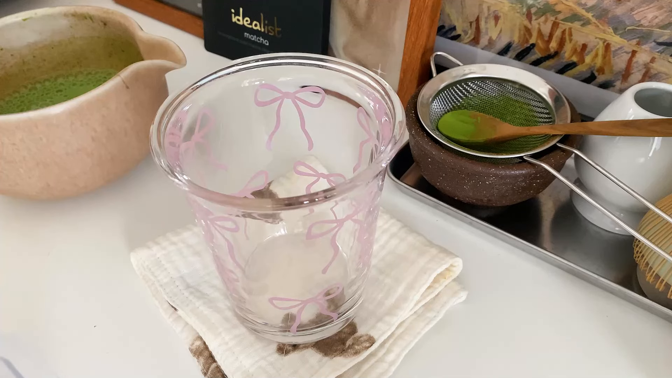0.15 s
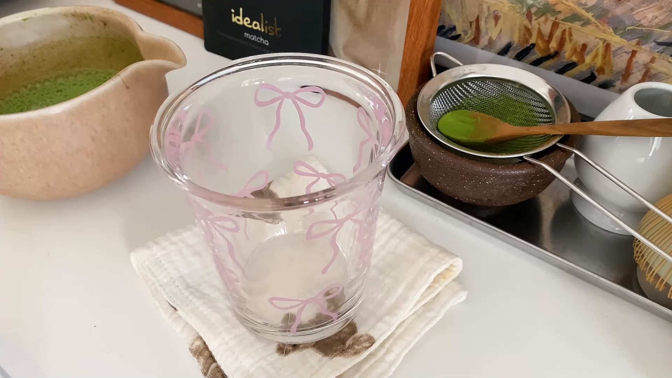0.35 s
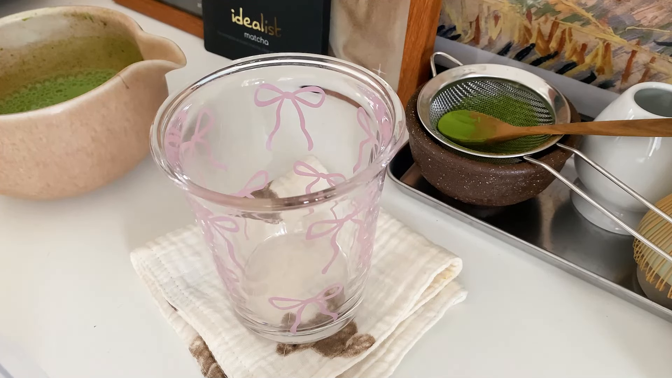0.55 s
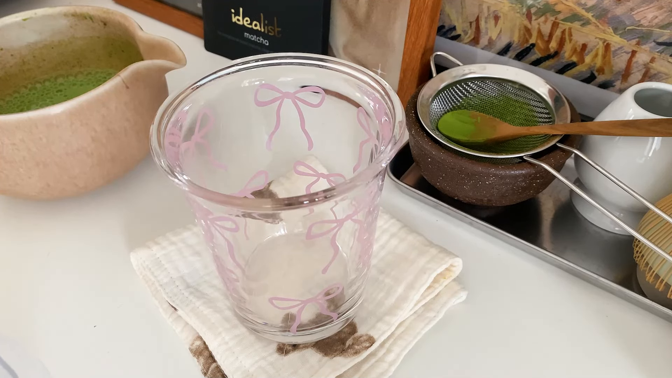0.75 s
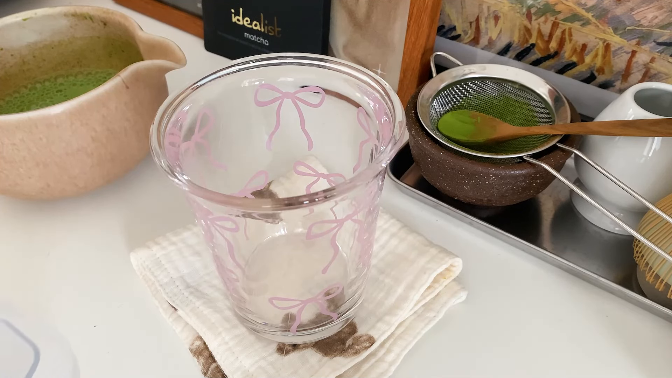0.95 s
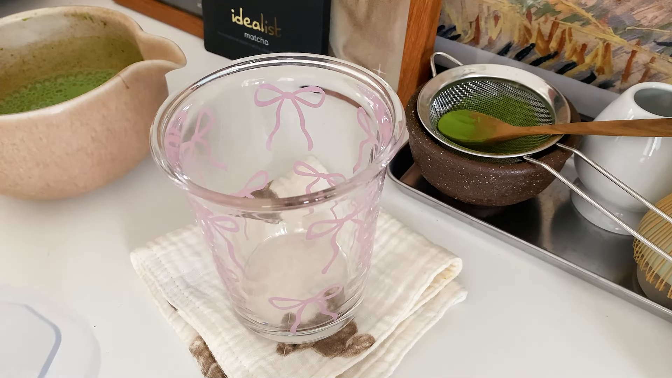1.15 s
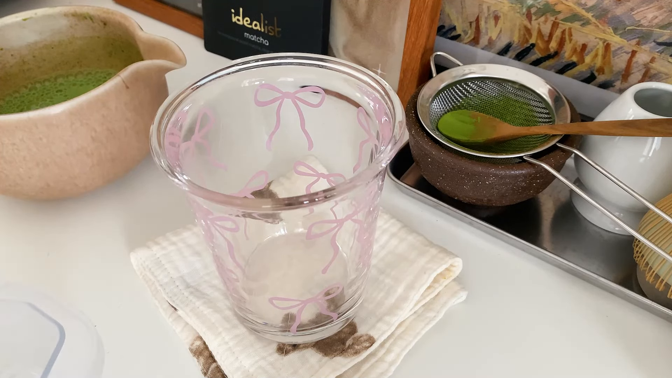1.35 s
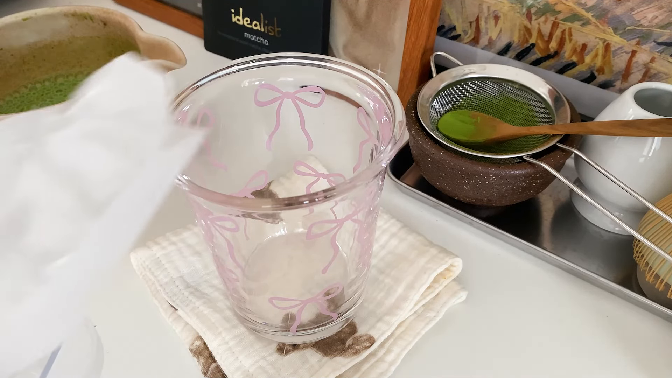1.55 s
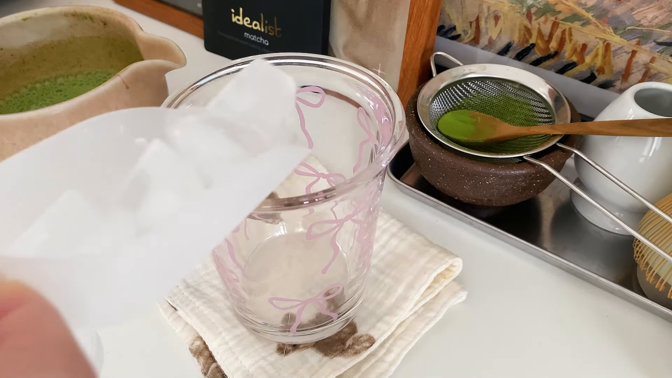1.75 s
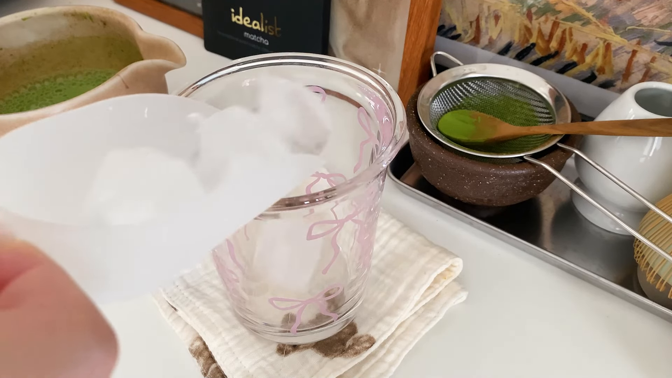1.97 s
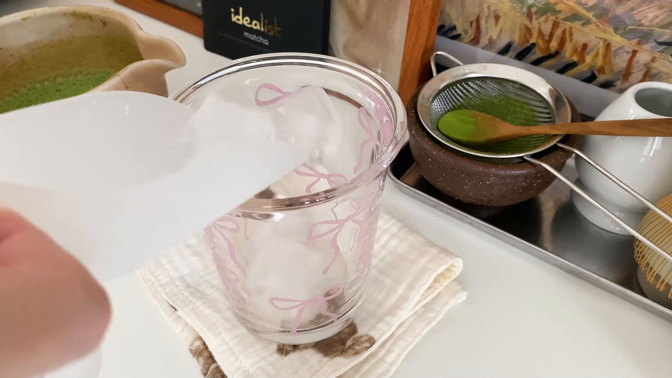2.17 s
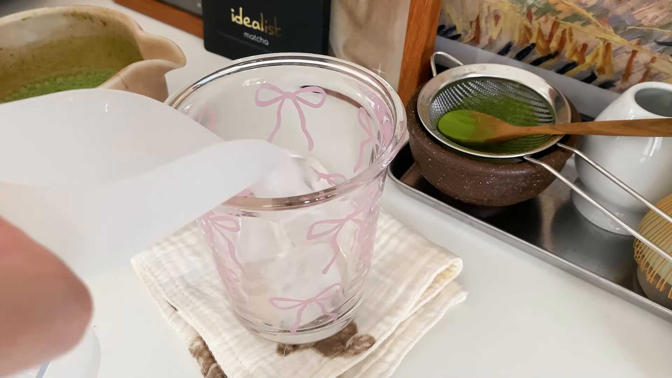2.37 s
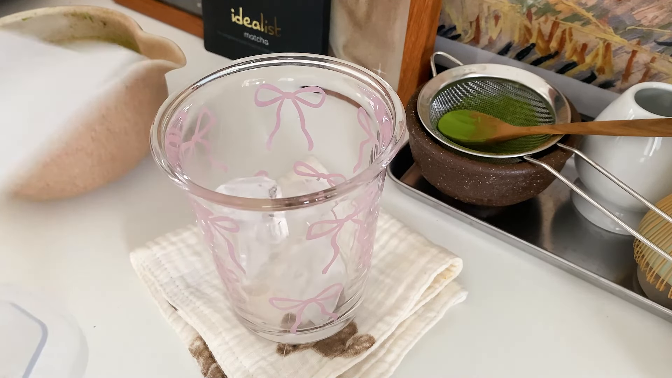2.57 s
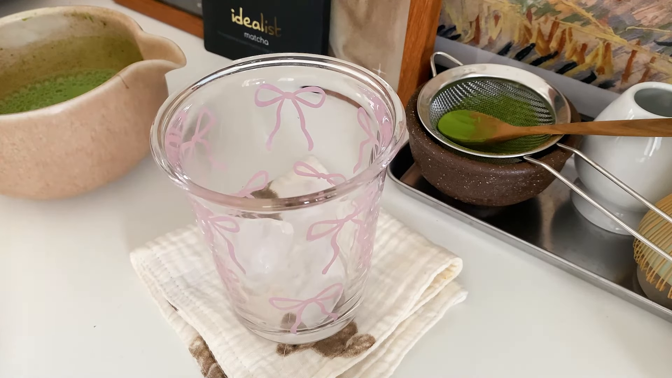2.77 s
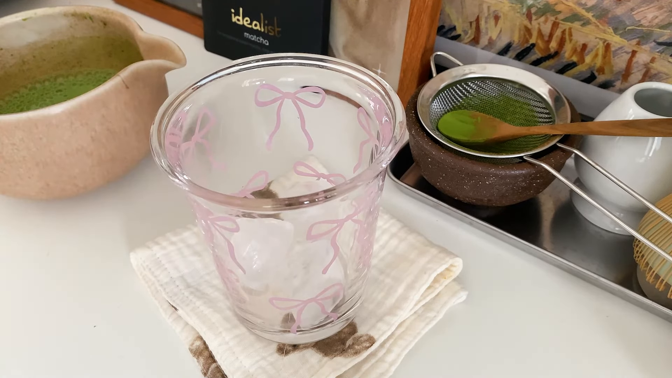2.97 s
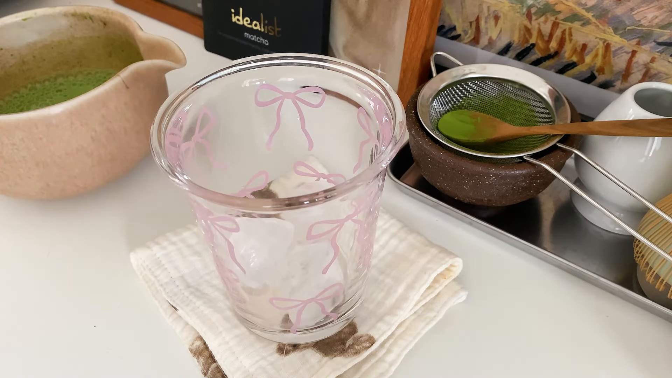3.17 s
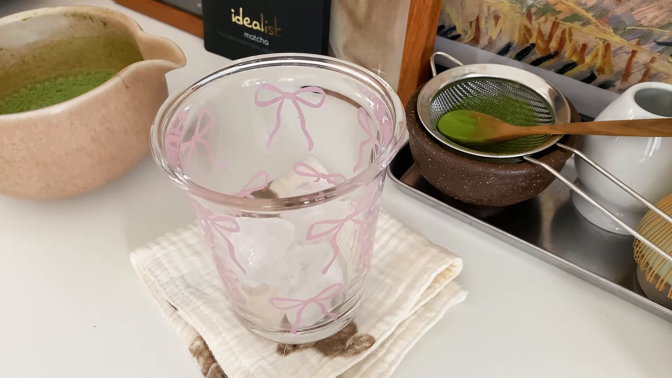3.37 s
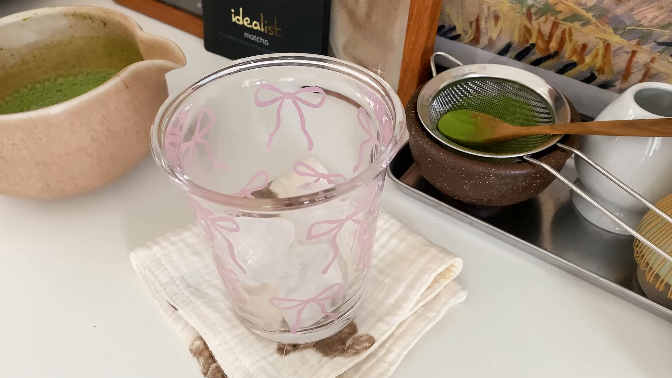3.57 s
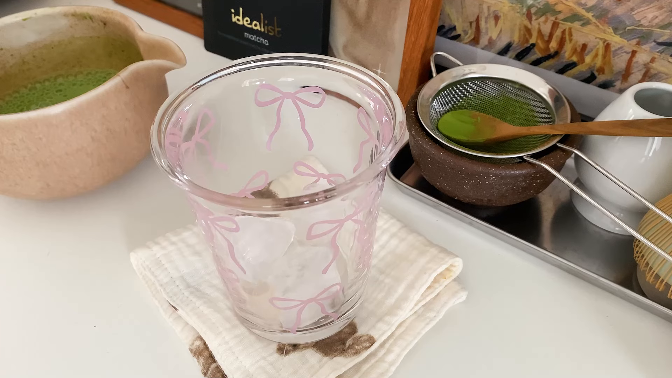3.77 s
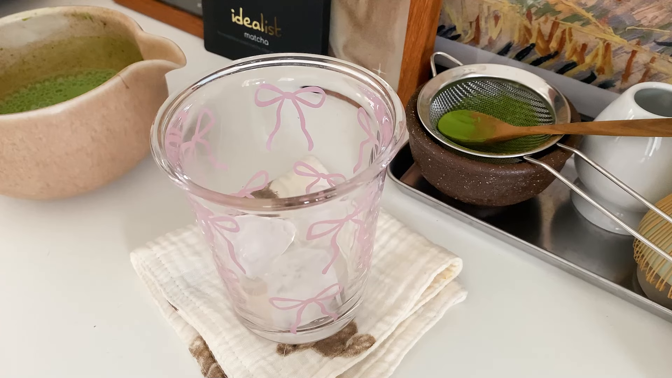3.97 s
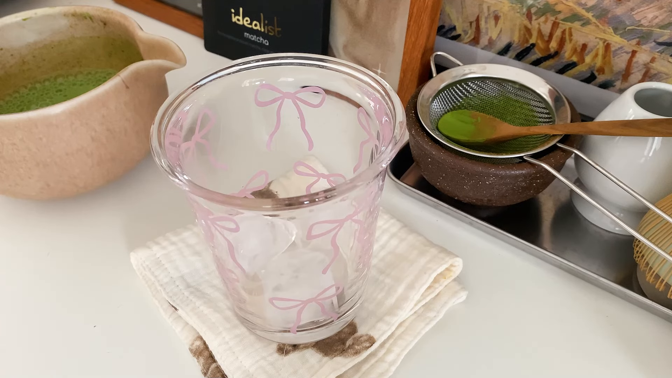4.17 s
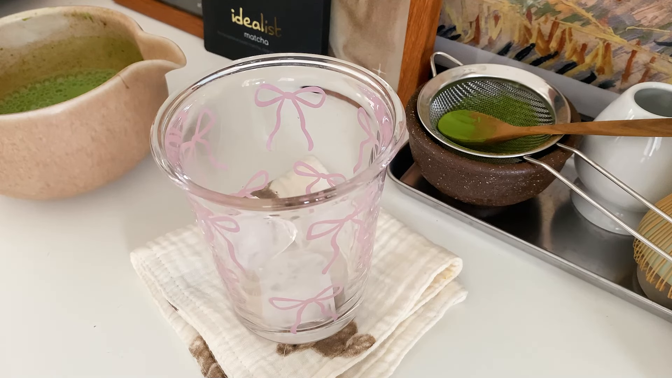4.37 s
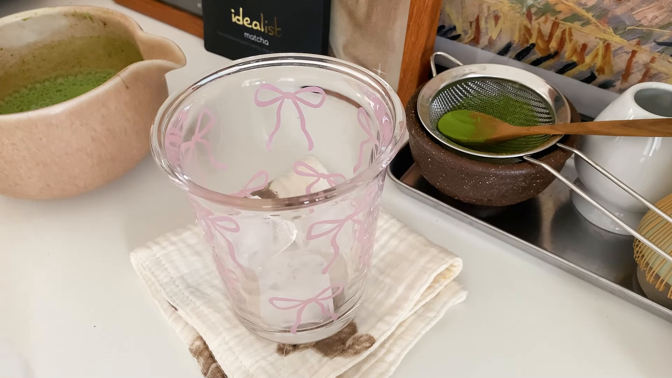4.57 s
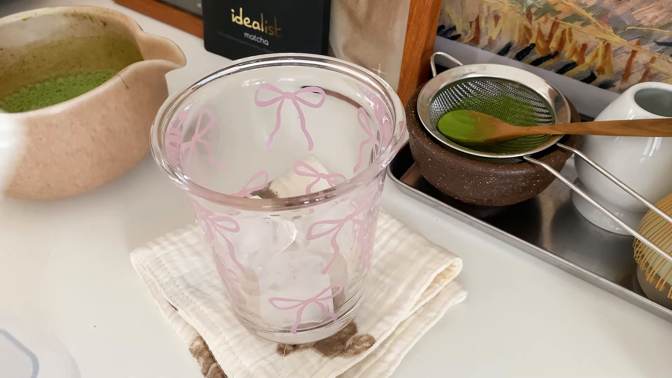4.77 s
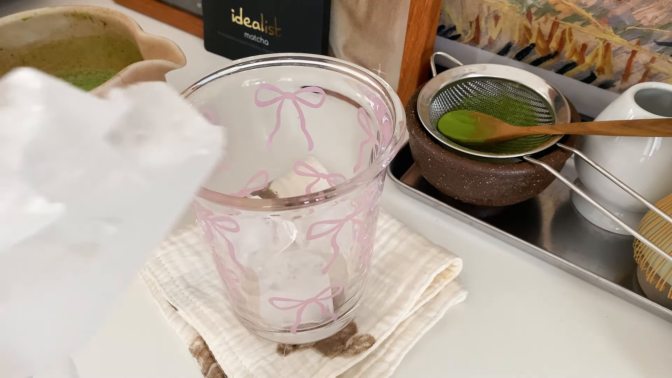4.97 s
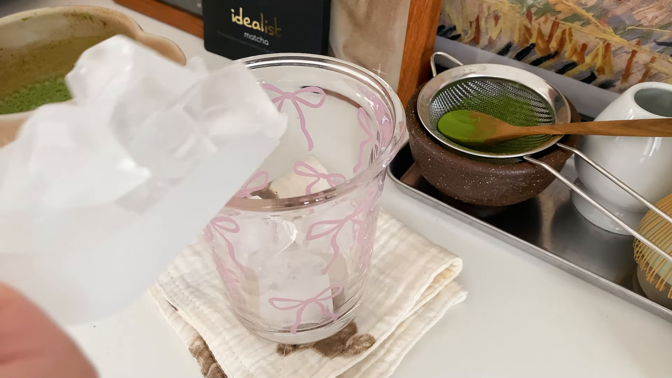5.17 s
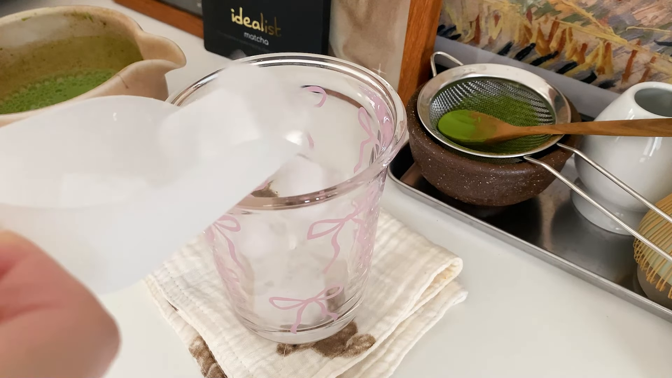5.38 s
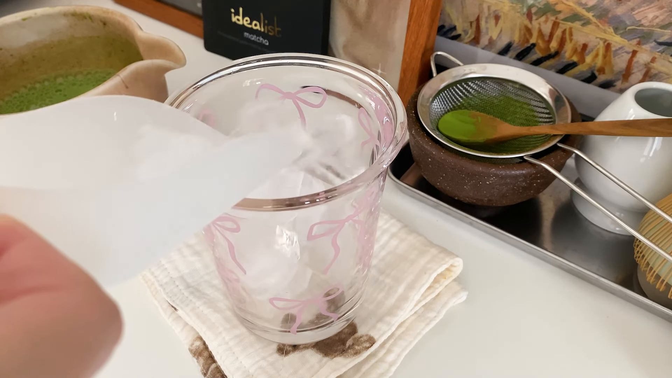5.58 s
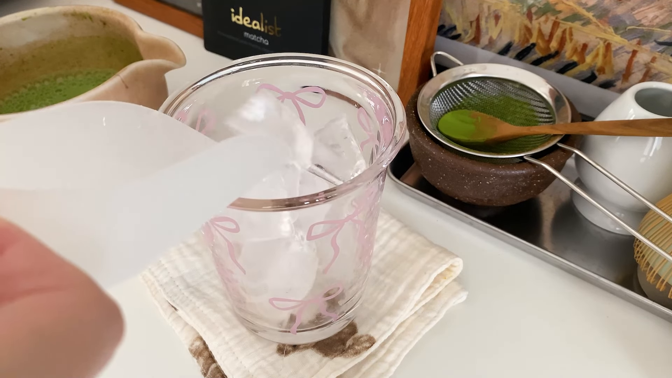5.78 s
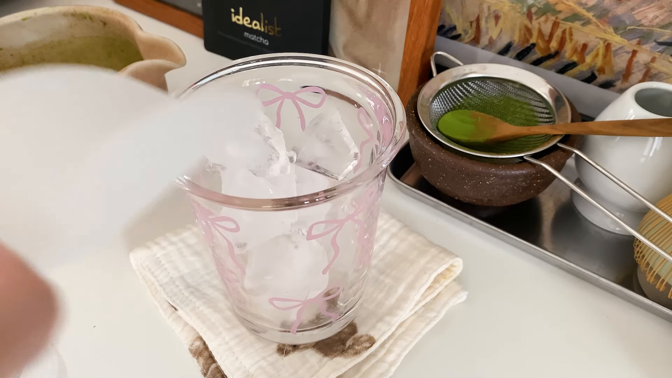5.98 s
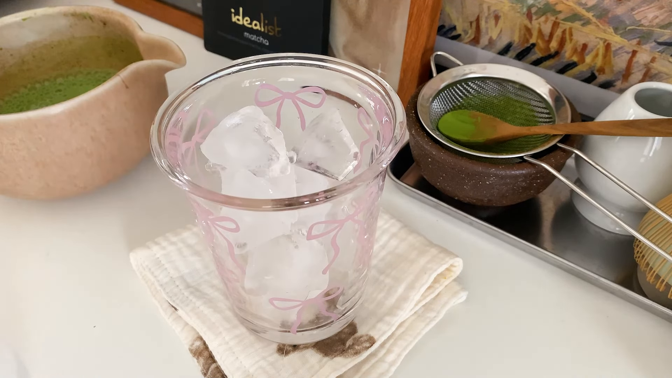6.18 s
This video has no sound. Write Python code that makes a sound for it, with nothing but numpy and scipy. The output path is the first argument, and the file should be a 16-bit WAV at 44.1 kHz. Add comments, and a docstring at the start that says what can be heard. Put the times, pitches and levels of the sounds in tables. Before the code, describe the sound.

A small, quiet kitchen with a soft low hush and a very faint appliance hum, picked up close in stereo leaning left. From 0 to 0.8 s a plastic scoop digs through ice: gritty crunch and hollow knocks, strongest around 0.2-0.7, with a few weaker rattles until 1.3. A lull, then light ticks at 1.75 as cubes slide down the scoop. From 1.97 to 2.8 they strike an empty glass in irregular sharp cracks with short bright clinks and a hollow airy note. A second, longer dig runs from 2.9 to 4.3, crunchy and clattering, with heavy knocks near 3.7 and 3.9. One low dull thump at 4.75. At 5.02 cubes tick in the scoop, wet ice squeaks briefly around 5.1-5.3, then a denser pour clatters from 5.3 to 5.9, ice on ice and glass, more damped, thinning out by 6.

```python
"""A small quiet kitchen, taken on a phone with two microphone ports; everything leans to the left port.
A plastic scoop twice digs through an ice bin and tips its cubes into a glass tumbler.
Grainy noise makes the crunch in the bin and the slide down the scoop; short bursts and notes make the
knocks and cracks; a bending tone is a squeak; each strike resets the fading modes of glass and air.
Under it lie soft broad noise and two faint appliance tones."""
import sys
import numpy as np
from scipy import signal
from scipy.fft import rfft, irfft, next_fast_len
from scipy.io import wavfile
from scipy.ndimage import uniform_filter1d

SR = 44100
rng = np.random.default_rng(int(sys.argv[2]) if len(sys.argv) > 2 else 0)


def put_to_file(sound):
    """Save the sound as 16-bit audio at rate SR, in the file named by the first command-line argument."""
    columns = np.atleast_2d(sound).T  # one column per channel
    safe = np.clip(columns, -1, 1)
    whole_steps = np.round(safe * 32767)
    wavfile.write(sys.argv[1], SR, whole_steps.astype(np.int16))


N = 274807

# Cubes striking the glass, and (5.02 to 5.30 s) a few ticking in the scoop before the second pour:
# start_s, crack_db, then the ring left in the air column, the lowest wall mode and the upper wall modes:
# air_db, low_db, upper_db (before each mode's own offset),
# and sharpness_db (extra treble in the crack and in the high wall modes)
CUBE_STRIKES = [(1.9728, -31, -65.5, -22.5, -46.5, 7), (1.9902, -11.5, -9, -30.5, -51, -17),
                (2.168, -18.5, -51, -44, -11.5, -3.5), (2.1796, -20, -25.5, -23.5, -20, 1),
                (2.249, -20.5, -32, -28, -21, -10.5), (2.287, -15, -55, -57, -22.5, -8.5),
                (2.296, -24, -25, -47, -52, 22.5), (2.3095, -27, -37, -24, -28.5, 1),
                (2.3809, -12, -39, -51, -42, 7.5), (2.387, -13.5, -30.5, -29, -28, -2),
                (2.4495, -22, -32.5, -35, -45, -19), (2.467, -35, -33, -35, -33.5, -7.5),
                (2.488, -32, -47, -38.5, -43, -3), (2.524, -26.5, -34, -47, -42, -9),
                (2.698, -26, -46, -45, -41.5, -10), (2.7229, -21, -27, -39.5, -40, -12),
                (2.759, -23.5, -61, -36, -33.5, -13), (2.804, -33, -33, -52, -71, -20),
                (5.0222, -22, -53, -40.5, -63.5, -4), (5.205, -39, -70, -75, -70, -10),
                (5.271, -52, -60.5, -71.5, -64, -10), (5.2984, -33, -66, -51, -46, 9),
                (5.3145, -15.5, -44, -26, -48, 3), (5.3672, -21.5, -31, -57, -42, 6.5),
                (5.397, -8, -30, -37.5, -19, -6), (5.4045, -12, -24, -40.5, -56, 13),
                (5.439, -11.5, -21, -23.5, -23.5, -7), (5.4494, -19.5, -18, -23, -55, 3),
                (5.482, -18.5, -53.5, -53, -26, -12), (5.512, -15, -47, -56, -19.5, -11.5),
                (5.538, -18, -61, -26.5, -16, -2), (5.577, -17.5, -38.5, -36, -26, -13),
                (5.613, -27.5, -47, -44, -31, -22), (5.649, -29.5, -39, -47.5, -50, -3),
                (5.68, -23, -42, -70, -29.5, -14), (5.6961, -18, -54, -27.5, -36, -5.5),
                (5.7324, -20, -23, -66, -48, -2), (5.7615, -26, -64, -52, -40, 3.5),
                (5.791, -37.5, -58, -79, -63, 19.5), (5.8359, -13.5, -39.5, -33.5, -16, -12.5),
                (5.858, -25, -22, -34, -53, -19), (5.89, -25.5, -23, -55, -56, -18),
                (5.933, -43, -39, -48, -39, -5), (6, -53, -39.5, -48, -49, -15)]


def undb(db):
    """Amplitude of a level in dB."""
    return 10 ** (np.asarray(db) / 20)


def unit(x):
    """The signal scaled to rms 1."""
    return x / np.sqrt(np.mean(x ** 2))


def on_log(table, hz):
    """A (Hz, value) table read on a log-frequency axis."""
    table_hz, value = np.transpose(table)
    return np.interp(np.log(hz + 1), np.log(table_hz), value)


def colour(x, table):
    """Causal minimum-phase filter with the table's spectral shape and unit power gain."""
    log_gain = np.log(undb(on_log(table, np.fft.rfftfreq(2048, 1 / SR))))
    cepstrum = irfft(log_gain)
    # folding the cepstrum onto positive time makes the filter causal
    cepstrum[1:1024] *= 2
    cepstrum[1025:] = 0
    impulse = irfft(np.exp(rfft(cepstrum)))
    impulse = impulse / np.sqrt(np.sum(impulse ** 2))
    return signal.fftconvolve(x, [impulse], axes=1)[:, :N]


def split(x, hz):
    """Body and treble of a sound, below and above hz."""
    filters = [signal.butter(2, hz, kind, fs=SR, output="sos") for kind in ("low", "high")]
    return [signal.sosfilt(sos, x) for sos in filters]


def curves(tables):
    """Gain along (s, dB) tables; silent between them."""
    t = np.arange(N) / SR
    return sum(undb(np.interp(t, s, db, -200, -200)) for s, db in map(np.transpose, tables))


def bursts(rows, ms, treble_share, rise_ms):
    """Envelopes of sudden (s, dB, treble over body dB) contacts, body and treble; the treble dies sooner."""
    out = np.zeros((2, N + SR))
    t_ms = np.arange(SR // 4) / SR * 1000
    rise = 1 - np.exp(-t_ms / rise_ms)
    for s, db, treble_db in rows:
        at = slice(int(s * SR), int(s * SR) + len(t_ms))
        out[0, at] += undb(db) * rise * np.exp(-t_ms / ms)
        out[1, at] += undb(db + treble_db) * rise * np.exp(-t_ms / (ms * treble_share))
    return out[:, :N]


def grains(rate, spread_db, ms):
    """Envelope of many small random contacts (rate per second), each fading over ms; rms 1."""
    hit = rng.random(N) < rate / SR
    size = np.minimum(rng.exponential(size=N), 3)
    decay = np.exp(-1000 / (ms * SR))
    return unit(signal.lfilter([1], [1, -decay], hit * undb(spread_db * size)))


def ice_noise(env, table, split_hz):
    """Noise under a body and a treble envelope, drawn three times: both ports, left alone, right alone."""
    body, treble = (split(colour(e * rng.standard_normal((3, N)), table), split_hz)[k]
                    for k, e in enumerate(env))
    return body + treble


def ringing(x, body):
    """The sound plus what a hollow body adds at its (Hz, width Hz, dB) resonances."""
    return x + sum(undb(db) * signal.lfilter(*signal.iirpeak(hz, hz / width, SR), x)
                   for hz, width, db in body)


def clacks(rows, t60):
    """Each (s, dB, Hz) sounds its own short note."""
    out, t = np.zeros((3, N + SR)), np.arange(SR // 10) / SR
    attack = np.clip(t / 0.00036, 0, 1)
    for (s, db, hz), phase in zip(rows, rng.random((len(rows), 3, 1))):
        note = np.sin(2 * np.pi * (hz * t + phase)) * undb(db - 60 * t / t60) * attack
        out[:, int(s * SR):int(s * SR) + len(t)] += note
    return out[:, :N]


def hush():
    """Kitchen background: soft broad noise and faint steady appliance tones."""
    # spectral shape of the room noise: freq_hz, relative_db (per Hz)
    room_colour = [(60, -15), (150, -17.5), (400, 4), (800, -0.5), (2000, -10.5), (3500, -24),
                   (11000, -32.5), (15000, -49)]
    # appliance tones before the ports: pitch_hz, level_db
    appliance_tones = [(199.2, -76.5), (393.0, -66)]
    t = np.arange(N) / SR
    tones = sum(undb(db) * np.sin(2 * np.pi * (hz * t + rng.random())) for hz, db in appliance_tones)
    noise = undb(-62) * colour(rng.standard_normal((3, N)), room_colour)
    return noise + tones * [[1], [0], [0]]  # tones go to the row both ports share


def ice_bin():
    """Crunch and knocks ring the hollow plastic bin; knocks are grainy, several contacts at once."""
    # scoop stirring the bin, one list per dig: time_s, crunch_db
    digs = [
        [(0, -51), (.05, -33), (.24, -36), (.39, -35), (.6, -36.5), (.72, -28), (.8, -38.5), (1.07, -54.5),
         (1.22, -49.5), (1.33, -58)],
        [(2.85, -56), (2.93, -35.5), (3.3, -23.5), (3.42, -31.5), (3.7, -33.5), (3.82, -40), (3.96, -36.5),
         (4.1, -47), (4.27, -39), (4.36, -52.5), (4.52, -67.5)],
    ]
    # cubes knocking in the bin; the last two rows are one low thump of the scoop or lid:
    # start_s, knock_db (before the grain), treble_over_knock_db, pitch_hz
    knock_rows = np.array([(0.166, -22, 4.5, 1890), (0.198, -17.5, 7.5, 1790), (0.22, -10.5, 6, 2860),
                           (0.228, -16.5, 10, 746), (.253, -9.5, 10.5, 1900), (0.295, -14.5, 6, 1610),
                           (0.332, -16.5, -1, 1404), (0.447, -8, 10.5, 1755), (0.491, -13, 15, 3940),
                           (.506, -3.5, 9, 730), (0.532, -15.5, 17, 617), (0.566, -36.5, 31, 1820),
                           (.638, -23.5, -13, 720), (0.658, -16, 9, 1670), (.684, -5.5, 1, 718),
                           (.706, -27.5, 3, 710), (.723, -11.5, 9, 605), (0.741, -24.5, -6, 1670),
                           (0.918, -31.5, 17.5, 880), (0.949, -24, 7, 1640), (1.123, -24.5, -4, 1870),
                           (1.187, -30, 4, 2890), (1.233, -30, 2, 2860), (1.252, -27.5, -8, 1840),
                           (2.927, -23, 0, 1900), (2.985, -17.5, -16, 744), (3.043, -21.5, 2.5, 1900),
                           (3.101, -24.5, 11.5, 1940), (3.116, -23, 21, 3100), (3.179, -10, -0.5, 760),
                           (3.232, -12, 6.5, 1990), (3.268, -10.5, 14, 2340), (3.283, -20.5, 19, 720),
                           (3.329, -18.5, 18.5, 2330), (3.353, -30.5, 12, 720), (3.444, -15, 5.5, 1970),
                           (3.521, -23, -0.5, 2400), (3.543, -22.5, 14.5, 805), (3.604, -22, 8.5, 706),
                           (3.636, -21.5, 2.5, 1900), (3.698, -20.5, 9, 1600), (3.722, -9, 7, 655),
                           (3.847, -25, 11, 1900), (3.87, -3.5, 3, 757), (3.928, -14, 4.5, 1540),
                           (4.035, -24, 3, 2500), (4.049, -15, -1, 506), (4.128, -20, -1, 1810),
                           (4.149, -13, 8.5, 2090), (4.168, -18, -5.5, 750), (4.187, -12, 0, 1840),
                           (4.204, -14, 3.5, 2006), (4.248, -21, -9, 1694), (4.75, -22, 0.5, 314),
                           (4.759, -22, -2, 750)])
    # spectral shape of crunch and knocks: freq_hz, relative_db (per Hz)
    bin_colour = [(60, -57.5), (150, -54), (300, -16.5), (700, 1.5), (1700, -2), (5000, -7), (8000, -18),
                  (14000, -13.5), (16000, -33)]
    # resonances of the bin: freq_hz, width_hz, added_db
    bin_body = [(346, 17, -8.5), (714, 45, 1), (1098, 24, 4), (1720, 140, 0), (2017, 77, -2.5)]
    dig = curves(digs)
    crunch = dig * grains(rate=450, spread_db=3.0, ms=3.5)
    knocks = bursts(knock_rows[:, :3], ms=5.0, treble_share=0.6, rise_ms=3.5)
    heap = 1.0 + 1.19 * grains(rate=900, spread_db=2.5, ms=1.0)
    noise = ice_noise(crunch + knocks * heap / 2, bin_colour, split_hz=4000)

    # small cubes clack everywhere in the heap, at any pitch from 800 to 4000 Hz
    when, pitch, size = rng.random((1400, 3)).T
    small = np.transpose([when * N / SR, -6 + 8 * size, 800 * 5 ** pitch])
    knock_notes = clacks(knock_rows[:, [0, 1, 3]], t60=.05) * undb(-8.5)
    notes = knock_notes + dig * clacks(small, t60=.022)
    return ringing(noise, bin_body) + split(notes, 350)[1]


def squeak():
    """Stick-slip of wet ice on plastic: a rough, bending tone."""
    # a cube sticking on the scoop: time_s, pitch_hz, level_db (before the roughness)
    bends = [(5.099, 2270, -62.5), (5.14, 2425, -53), (5.163, 2640, -60), (5.177, 2383, -45),
             (5.23, 2277, -55.5), (5.29, 2320, -63)]
    s, hz, db = np.transpose(bends)
    t = np.arange(N) / SR
    rough = unit(uniform_filter1d(rng.standard_normal((3, N)), size=80))
    gain = undb(np.interp(t, s, db, -200, -200))
    tone = np.sin(2 * np.pi * np.cumsum(np.interp(t, s, hz)) / SR)
    return gain * (1.5 + rough) * tone


def sliding():
    """Grainy rubbing down the scoop, duller once the ice is in the glass, where it makes air and wall hum."""
    # cubes sliding and settling, one list per pour: time_s, slide_db (before the grain)
    slides = [
        [(1.625, -74), (1.66, -69), (1.81, -52.5), (1.95, -51), (2.05, -43.5), (2.4, -51.5), (2.55, -57),
         (2.68, -69.5), (2.8, -47), (2.86, -81)],
        [(5.03, -80), (5.17, -58), (5.25, -50), (5.5, -44.5), (5.9, -51.5), (6.05, -59.5)],
    ]
    # spectral shape of the rubbing: freq_hz, relative_db (per Hz)
    slide_colour = [(150, -41.5), (400, -4.5), (900, -4.5), (1650, -3), (3500, -9), (8000, -7.5),
                    (15300, -5.5), (16000, -38)]
    # resonances of the scoop: freq_hz, width_hz, added_db
    scoop_body = [(1000, 300, 13.5), (2210, 230, 9), (3620, 460, 14.5)]
    # air and lowest wall mode under shifting ice: freq_hz, width_hz, added_db
    glass_hum = [(885, 45, 20), (2460, 40, 18.5)]
    # ice in the glass: from_s, to_s
    pours = [(2.0, 2.85), (5.36, 6.05)]
    # moments when the scoop is empty: time_s
    scoop_empty = [2.54, 5.8]
    open_treble_db, glass_treble_db, dulls_in_s = 2, -36, 0.035
    t = np.arange(N) / SR
    settled = sum(np.clip((t - s) / dulls_in_s, 0, 1) * (t < s + 1) for s in scoop_empty)
    treble = undb(open_treble_db + (glass_treble_db - open_treble_db) * settled)
    slide = curves(slides) * (0.27 + grains(rate=320, spread_db=4.0, ms=2.0) / 2)
    rubbing = ice_noise(slide * [np.ones(N), treble], slide_colour, split_hz=6000)
    in_glass = rubbing * curves([[(a, 0), (b, 0)] for a, b in pours])
    hum = ringing(in_glass, glass_hum) - in_glass  # only what the glass adds
    return ringing(rubbing, scoop_body) + hum


def cracking():
    """Dry cracks of cubes on scoop and glass: a noise burst and two short notes for every strike."""
    # cubes ticking in the scoop: start_s, crack_db, extra_treble_db
    ticks = [(1.737, -40, 6), (1.7846, -33, 5), (5.0194, -30.5, -7), (5.177, -46, 14), (5.205, -42, -10),
             (5.27, -49, -10), (5.284, -39.5, 16.5), (5.2988, -29.5, 0)]
    # spectral shape of a crack: freq_hz, relative_db (per Hz)
    crack_colour = [(150, -49), (400, -5.5), (900, 12), (2000, 8), (4000, 12.5), (8000, 0.5), (14500, -2.5),
                    (16000, -35)]
    rows = np.vstack([np.array(CUBE_STRIKES)[:, [0, 1, -1]], ticks])
    start_s, crack_db, extra_treble_db = rows.T
    hits = np.transpose([start_s, crack_db, 0.5 + extra_treble_db])
    cracks = bursts(hits, ms=1.8, treble_share=0.81, rise_ms=0.27)
    # every cube has its own two notes, from 1914 Hz to three times that
    pitch_hz = 1914 * 3 ** rng.random((len(rows), 2))
    notes = sum(clacks(np.transpose([start_s, crack_db - 11.5, hz]), t60=0.028) for hz in pitch_hz.T)
    return ice_noise(cracks, crack_colour, split_hz=7000) + split(notes, 800)[1]


def tumbler():
    """Every row of CUBE_STRIKES feeds some modes and chokes others; each then fades from its new strength."""
    # air note as cubes shorten or cover the column: time_s, pitch_hz
    air_column = [(1.98, 835), (2.3, 878), (2.7, 907.5), (5.3, 887), (6.1, 867)]
    # wall modes, lowest first: pitch_hz
    wall_hz = [2472, 4975, 6303, 6373, 8936, 10505, 11180, 15275]
    # for each wall mode: offset_db, t60_s, then once ice leans on the wall: change_db, loaded_t60_s
    wall = [(-2, 1, 9, 0.037), (-6, .056, -8.5, 0.066), (10, 0.036, -5.5, 0.035), (-8.5, 0.054, 8, 0.057),
            (2, 0.14, -2.5, .05), (-4, 0.097, 1, 0.062), (-18.5, .067, 18.5, 0.082),
            (-14, 0.057, -13, 0.0383)]
    # from the empty to the loaded glass: time_s
    fills = [2.45, 3.3]
    # rms flutter of the ring in the empty and the loaded glass: depth_db
    flutter_depth = [1.6, 3.6]
    rows, t, out = np.array(CUBE_STRIKES), np.arange(N) / SR, 0
    last = np.maximum(np.searchsorted(rows[:, 0], t) - 1, 0)  # latest strike at each moment
    since = np.where(t > rows[0, 0], t - rows[last, 0], 10)  # faded out before the first strike
    loaded = np.interp(t, fills, [0, 1])
    air_db, low_db, upper_db, sharp_db = rows[last, 2:].T

    # each mode: pitch_hz, struck level_db, t60_s
    modes = [(np.interp(t, *np.transpose(air_column)), air_db - 6.5, 0.1)]
    # a cube that reaches the bottom sounds the thick base as well as the air
    modes.append((14660 * np.ones(N), air_db - 23.5, .07))
    for k, (hz, (db, t60, change_db, loaded_t60)) in enumerate(zip(wall_hz, wall)):
        struck_db = (upper_db if k else low_db) + sharp_db * (hz > 8000)
        level_db = struck_db + db + change_db * loaded
        modes.append((hz * np.ones(N), level_db, t60 + (loaded_t60 - t60) * loaded))

    for hz, db, t60 in modes:
        env = uniform_filter1d(undb(db - 60 * since / t60), size=24)
        # the more ice leans on the wall, the more the ring flutters
        flutter = unit(uniform_filter1d(rng.standard_normal(N), size=400))
        env *= undb(np.interp(t, fills, flutter_depth) * flutter)
        # each touch shifts the mode by a random 0.2 % or so
        touched_hz = hz * (1 + .002 * rng.standard_normal(len(rows))[last])
        out = out + env * np.sin(2 * np.pi * (np.cumsum(touched_hz) / SR + rng.random()))
    return split(out, 500)[1]


def kitchen(x, wet_db, t60):
    """Row 0 reaches both ports, with their lag; rows 1 and 2 reach one port each; the room adds a tail."""
    # left port over right: freq_hz, difference_db
    left_over_right = [(100, 2), (250, .5), (700, 5), (2400, 3), (5000, 5.5), (8100, 2.5), (10000, .3)]
    # share of the power that both ports hear alike: freq_hz, share
    alike_share = [(60, .3), (150, .8), (700, .75), (2000, .55), (5500, .5), (7500, .75), (9500, .94)]
    # phase by which the left port leads: freq_hz, lead_rad
    left_lead = [(0, 0), (520, 2.9), (780, 1.8), (1210, 3.5), (2240, 4.5), (3270, 8.2), (5250, 10.7),
                 (6890, 6.6), (11600, -.4), (15000, -6.2)]
    size = next_fast_len(N + SR)
    hz, t = np.fft.rfftfreq(size, 1 / SR), np.arange(SR // 2) / SR
    tail = undb(wet_db - 60 * t / t60) * np.clip(t / 0.0038, 0, 1) * rng.standard_normal((3, len(t)))
    tail[:, 0] = 1  # direct sound
    shared, *own = rfft(tail, size) * rfft(x, size)
    alike = on_log(alike_share, hz)
    side = np.array([[.5], [-.5]])  # left, right
    turn = np.exp(1j * side * np.interp(hz, *np.transpose(left_lead)))
    ports = np.sqrt(alike) * shared * turn + np.sqrt(1 - alike) * np.array(own)
    return irfft(ports * undb(side * on_log(left_over_right, hz)), size)[:, :N]


def scene():
    """Background, bin, scoop and glass, each with its own amount and length of room tail."""
    background = kitchen(hush(), wet_db=-58.5, t60=0.27)
    far = kitchen(ice_bin(), wet_db=-31.0, t60=0.18)
    close = kitchen(squeak() + sliding() + cracking(), wet_db=-27.5, t60=0.11)
    glass = kitchen(tumbler() * [[1], [0], [0]], wet_db=-40.0, t60=0.24)
    return background + far + close + glass


def record(dry):
    """The phone thins the deep bass below 70 Hz and cuts the top above 15.8 kHz."""
    thin = split(dry, 70.)[1]
    return signal.sosfilt(signal.ellip(8, .2, 70, 15800, fs=SR, output="sos"), thin)


dry = scene()
out = record(dry)
put_to_file(out)
```